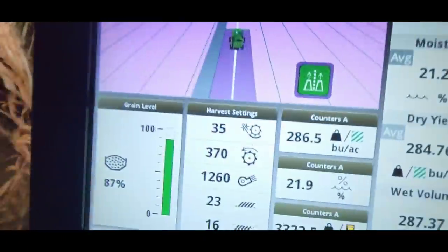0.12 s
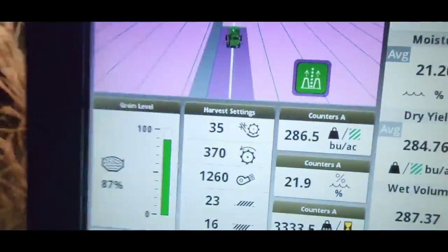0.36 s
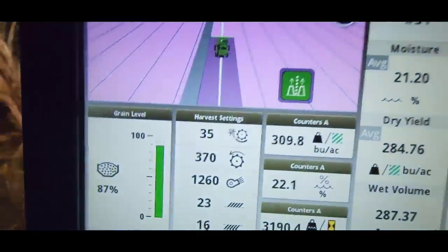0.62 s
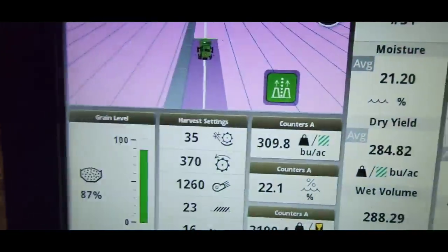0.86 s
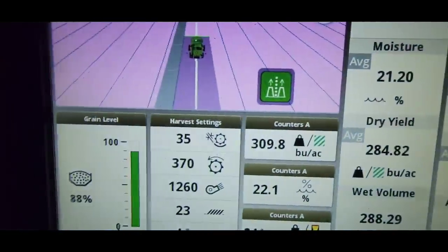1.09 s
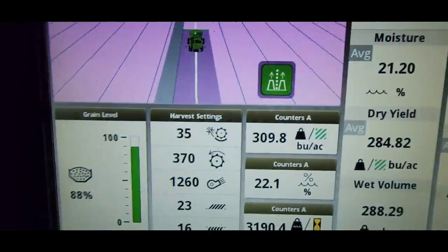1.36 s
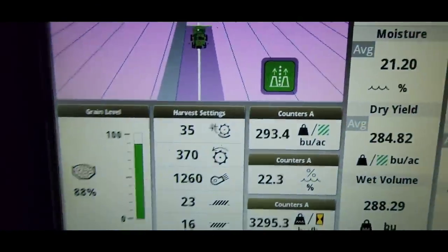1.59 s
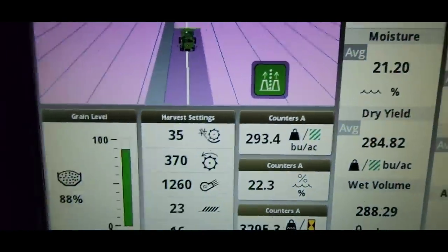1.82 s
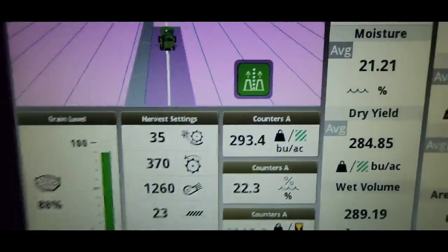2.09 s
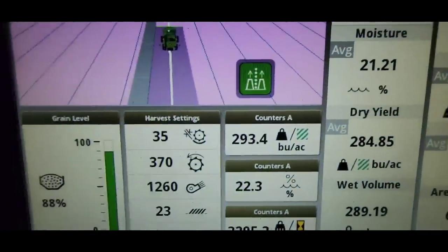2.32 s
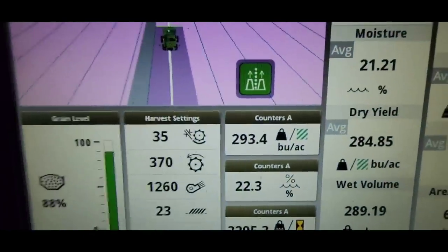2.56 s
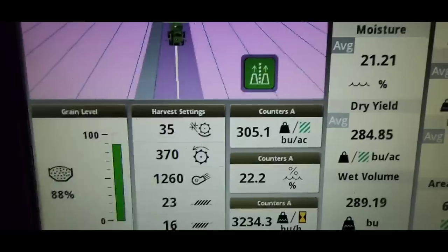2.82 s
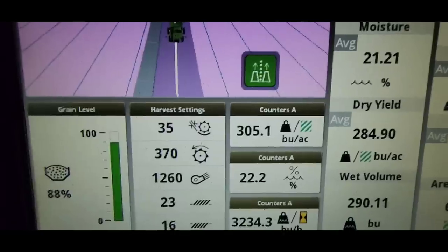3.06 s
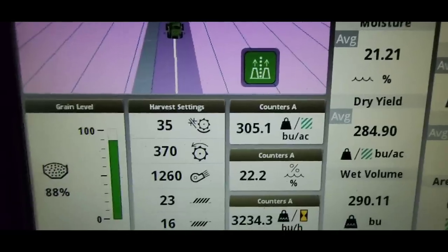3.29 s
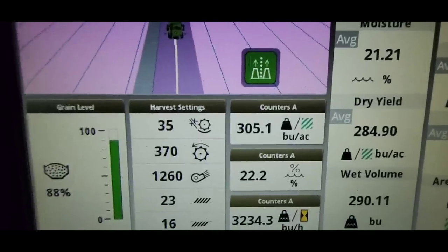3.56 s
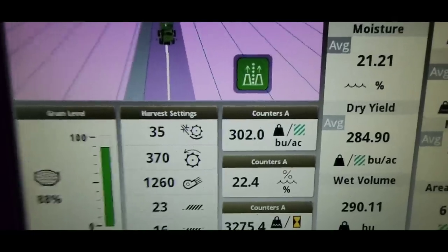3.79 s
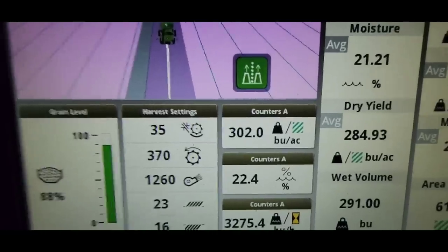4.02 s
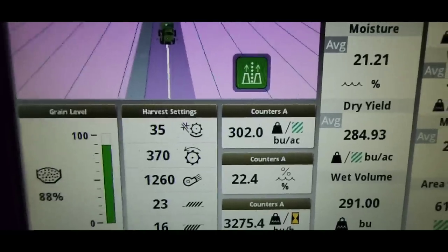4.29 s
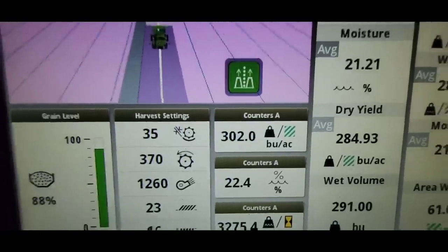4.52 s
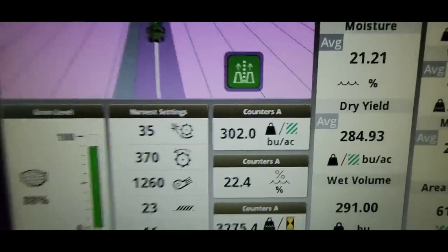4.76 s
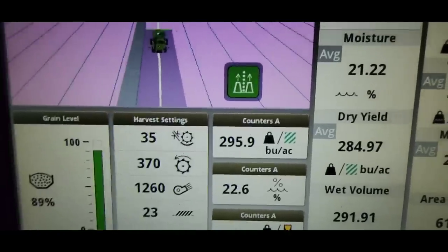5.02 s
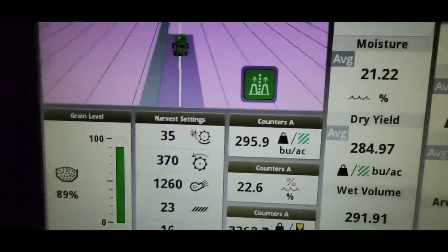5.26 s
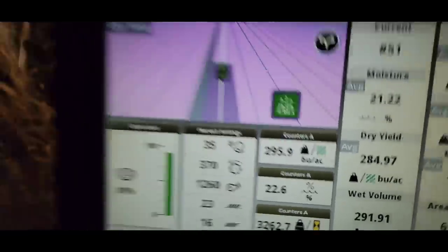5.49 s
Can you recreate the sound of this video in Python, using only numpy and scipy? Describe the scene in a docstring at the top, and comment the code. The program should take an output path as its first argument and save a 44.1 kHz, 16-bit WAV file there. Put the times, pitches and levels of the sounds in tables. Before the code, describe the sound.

A steady, heavy harvester drone heard from the cab: deep pulsing hum, muffled rumble, thin high whine and quiet rushing of fan and grain.

```python
"""The six-cylinder firing hum of a combine harvester wavers near 96 Hz inside its closed cab as it shells corn.
Crank, rotor and shaft tones and a pump whine sing faintly through the panels as wavering sines.
The machine's rumble, noise shaped by peaks and dips, booms low and throbs about once a second.
Fan air and kernels rush above it as finer noise; a hand-held phone hears it all in stereo."""
import sys
import numpy as np
from scipy import signal
from scipy.fft import rfft, irfft, next_fast_len
from scipy.io import wavfile
from scipy.ndimage import uniform_filter1d

SR = 44100
rng = np.random.default_rng(int(sys.argv[2]) if len(sys.argv) > 2 else 0)


def undo_db(level):
    """Turn decibels back into plain size, where 20 dB means ten times bigger."""
    steps = np.asarray(level, float) / 20
    return 10 ** steps


def put_to_file(sound):
    """Save the sound as 16-bit audio at rate SR, in the file named by the first command-line argument."""
    columns = np.atleast_2d(sound).T  # one column per channel
    safe = np.clip(columns, -1, 1)
    whole_steps = np.round(safe * 32767)
    wavfile.write(sys.argv[1], SR, whole_steps.astype(np.int16))


N = 248283

# Swells of the firing hum as it beats against nearby shaft tones; each lasts until the next.
# Each row: start in seconds, pitch in Hz, rms level in dB before dips and glides, sign (+1 or -1).
HUM_SWELLS = [(-.1, 93.8, -16.5, 1), (.19, 93.6, -31, 1), (.295, 96.5, -20.5, -1), (.575, 95.4, -20.5, 1),
              (.85, 96.6, -16, 1), (.941, 95.6, -17, -1), (1.309, 98, -24, -1), (1.56, 95.1, -20, 1),
              (1.81, 95, -18.5, 1), (2.081, 96.5, -22, 1), (2.26, 95.3, -21.5, -1), (2.42, 95.8, -19, 1),
              (2.601, 95.5, -19.5, -1), (2.76, 94.2, -18.5, -1), (3.04, 96.2, -16, 1),
              (3.459, 97.4, -23, -1), (3.72, 96.8, -20.5, 1), (3.82, 96.2, -20.5, 1), (4.05, 96.3, -17, -1),
              (4.38, 95, -17.5, -1), (4.65, 97.6, -19.5, 1), (5.05, 96.7, -18, -1), (5.3, 93.3, -20.5, 1),
              (5.51, 98.7, -25.5, -1)]
# Crankshaft orders in the panels. Each row: multiple of crank speed, rms level in dB, waver in dB,
# left minus right in dB, left lead in radians.
CRANK_ORDERS = [(11, -44.5, 3, 0, -.6), (16, -47, 4, 0, .1)]
# Threshing rotor orders in the frame. Each row: multiple of rotor speed, rms level in dB, waver in dB,
# left minus right in dB, left lead in radians.
ROTOR_ORDERS = [(4, -48, 2, 0, 0), (9, -46, 2, 0, 0), (12, -42, 2, 0, 0), (19, -40, 2, -.7, 0),
                (20, -37, 2, -.7, 0)]
# Other shafts, gears and the pump. Each row: pitch in Hz, rms level in dB, waver in dB,
# left minus right in dB, left lead in radians.
SHAFT_TONES = [(20.1, -49, 2, 0, 0), (32.4, -41, 2, 0, 0), (45.4, -43, 3, 0, 0), (58.3, -43, 2, 0, 0),
               (82.4, -38, 2, 0, 0), (255, -44, 3, 0, 1.3), (415.4, -51, 3, 2, 0), (443, -54, 3, 1, 0),
               (648, -59, 3, 0, 0), (792.6, -61, 3, 0, 0), (831, -62, 3, 0, 0), (854.3, -48.5, 2, -4, 2.2),
               (1709, -57.5, 2, -3, .1)]
# Pump and gear whine. Each row: centre in Hz, width of flutter in Hz, rms level in dB, left minus right in dB.
WHINE_TONES = [(1863, 38, -47, -7.5), (2590, 29.85, -63.5, 0), (2720, 19.95, -59, -16),
               (2760, 17.8, -62, 3)]
# Rumble of rotor, chains and frame before its peaks and dips. Each row: frequency in Hz, relative dB per Hz.
RUMBLE_SPECTRUM = [(14, -36), (22, -20), (27, -9.5), (38, -11), (47, -5), (56, -9.5), (65, -8.5), (100, -4),
                   (185, -12), (300, -18.5), (375, -28), (480, -20.5), (700, -29), (1000, -30.5),
                   (1100, -49), (1500, -63)]
# Peaks and dips of the rumble; the dip at 96 Hz leaves room for the hum.
# Each row: centre in Hz, width in Hz, boost or cut in dB.
RUMBLE_PEAKS = [(75, 8, -1), (85.8, 10, 8), (96.2, 6.1, -9.5), (127, 27.3, 7), (159, 13, 1),
                (183.3, 9.4, -5), (203.3, 36, 5.5), (222, 9.1, -2.5), (256, 31.4, 10.5), (274, 17, -3),
                (340.2, 30, 10), (412, 22, 8), (441, 39, 4), (433, 8.1, -2.5), (487, 17, -1.5),
                (520, 24, 4), (560, 23, -1.5), (610, 41, 2.5), (654, 28, 5), (680, 30, -1.5), (723, 50, 4),
                (770, 16, 3.5), (803, 14, -1), (832, 11, 2), (868, 10, -2.5), (880, 17, 1)]
# Low bands that throb. Each row: centre in Hz, width in Hz, depth in dB.
THROB_BANDS = [(127, 25, 0.71), (249, 25, 2.34)]
# Rush of fan air and kernels, falling with pitch above 2 kHz and ending near 15.4 kHz.
# Each row: frequency in Hz, relative dB per Hz.
RUSH_SPECTRUM = [(620, -43), (1050, -13), (1100, -9.5), (1500, -7), (1840, -3), (2080, 1), (2570, -7.5),
                 (3000, -9.5), (3600, -12.5), (4200, -13.5), (4600, -17), (5890, -21.5), (6900, -25),
                 (7540, -25), (9300, -33.5), (9860, -37), (11000, -33.5), (11500, -27.5), (12000, -31),
                 (14300, -36.5), (15000, -40), (15350, -44), (15450, -70)]
# Width of the diffuse field at the two ports. Each row: frequency in Hz, side minus mid in dB.
FIELD_WIDTH = [(30, -34), (125, -17.5), (165, -12), (300, -10.5), (375, -5.5), (450, -9), (545, -13),
               (600, 1), (660, -6), (850, 5), (970, -5.5), (1090, 6), (1250, 6.5), (1500, 1.5),
               (1900, -0.5), (15000, -0.5)]
# Lean of the diffuse field. Each row: frequency in Hz, left minus right in dB.
FIELD_LEAN = [(60, 0), (125, -.7), (175, -3.5), (210, .5), (290, -.6), (400, 3), (520, .5), (620, 1),
              (700, -1.8), (780, .6), (900, -1.8), (1400, -1), (1600, -4.6), (3900, -4.5), (4500, -5.8),
              (6000, -.8), (8200, -2.3), (9900, -.2), (11500, -3.3), (13400, 1), (14500, 3.7)]

CRANK_HZ, ROTOR_HZ = 31.56, 6.128  # turns per second
DIP_DB, DIP_HALF_S = -5.5, 0.053  # depth and half length of a dip between swells
GLIDE_S = 0.051  # pitch and level glide between swells, smoothed twice over this span
THROB_S, THROB_PEAK_S = 1.023, 2.447  # period and a moment of the peak
RUMBLE_DB, RUSH_DB = -21, -38  # rms of the mid channel

EARS = np.array([[1.], [-1.]])  # left, right
T = np.arange(N) / SR
SIZE = next_fast_len(N)
HZ = np.arange(SIZE // 2 + 1) * SR / SIZE + 1e-3  # nudged off zero for the log


def along(table):
    """Joins a table of Hz and dB on a log-frequency axis."""
    hz, db = np.transpose(table)
    return np.interp(np.log(HZ), np.log(hz), db)


def walk(rate):
    """Random levels held for 1 / rate seconds and slewed twice, scaled to a standard deviation of 1."""
    hold = max(int(SR / rate), 1)
    held = np.repeat(rng.standard_normal(N // hold + 1), hold)[:N]
    slewed = uniform_filter1d(uniform_filter1d(held, hold), hold)
    return slewed / slewed.std()


def bell(hz, width):
    """A resonance-shaped bell: 1 at its centre, one half at the edges of its width."""
    return 1 / (1 + (2 * (HZ - hz) / width) ** 2)


def field(db, swell_db, swell_rate, flicker_db, flicker_rate):
    """Stereo noise in overlapping octave bands that swell together and flicker alone; low bands throb."""
    mid, side = rfft(rng.standard_normal((2, SIZE)))
    spread = mid + EARS * undo_db(along(FIELD_WIDTH)) * side
    ears = undo_db(db + EARS * along(FIELD_LEAN) / 2) * spread
    swell = swell_db * walk(swell_rate)
    out = 0
    for octave in range(3, 15):  # centres at 8 Hz to 16 kHz
        share = np.cos(np.pi / 2 * np.clip(np.log2(HZ) - octave, -1, 1)) ** 2
        band = irfft(share * ears, SIZE)[:, :N]
        out = out + undo_db(swell + flicker_db * walk(flicker_rate)) * band
    throb = np.cos(2 * np.pi * (T - THROB_PEAK_S) / THROB_S)
    for hz, width, depth_db in THROB_BANDS:
        band = irfft(ears * bell(hz, width), SIZE)[:, :N]
        out = out + (undo_db(depth_db * throb) - 1) * band
    mid_rms = np.sqrt(np.mean(out.sum(axis=0) ** 2)) / 2
    return out / mid_rms


def tones(table, hz, drift, blur):
    """Sines on multiples of a speed that wanders slightly at random; each one's phase wanders too."""
    turn = 2 * np.pi * np.cumsum(hz * (1 + drift * walk(3.49))) / SR
    out = 0
    for multiple, db, waver_db, pan_db, lead in table:
        phase = multiple * turn + 2 * np.pi * rng.random()
        phase = phase + blur * walk(8.) + EARS * lead / 2
        level_db = db + waver_db * walk(6.5) + EARS * pan_db / 2
        out = out + np.sqrt(2) * undo_db(level_db) * np.sin(phase)
    return out


def hum():
    """Firing tone, nearly alike at both ports; it dips between swells and nulls where its sign reverses."""
    start, hz, db, sign = np.transpose(HUM_SWELLS)
    swell = np.maximum(np.searchsorted(start, T) - 1, 0)
    glide = int(GLIDE_S * SR)
    steps = np.array([hz[swell], (undo_db(db) * sign)[swell]])
    pitch, level = uniform_filter1d(uniform_filter1d(steps, glide, axis=1), glide, axis=1)
    dip = np.clip(1 - np.abs(T - start[:, None]) / DIP_HALF_S, 0, 1).sum(axis=0)
    phase = 2 * np.pi * np.cumsum(pitch) / SR
    return np.sqrt(2) * level * undo_db(DIP_DB * dip - 0.22 * EARS) * np.sin(phase + 0.023 * EARS)


def crank():
    """Crankshaft orders singing through the panels."""
    return tones(CRANK_ORDERS, CRANK_HZ, drift=0.0015, blur=0.46)


def rotor():
    """Threshing rotor orders carried by the frame."""
    return tones(ROTOR_ORDERS, ROTOR_HZ, drift=0.0015, blur=0.26)


def shafts():
    """Other shafts, gears and the pump; at a base of 1 Hz the multiples are pitches in Hz."""
    return tones(SHAFT_TONES, 1, drift=0.00142, blur=0.28)


def whines():
    """Pump and gear tones blurred by speed flutter; their pitch wanders separately at each port."""
    out = 0
    for hz, width, db, pan_db in WHINE_TONES:
        pitch = hz + width / 2 * np.array([walk(25), walk(25)])
        phase = 2 * np.pi * np.cumsum(pitch, axis=1) / SR
        out = out + np.sqrt(2) * undo_db(db + EARS * pan_db / 2) * np.sin(phase)
    return out


def rumble():
    """Machine noise shaped by peaks and dips; the dip at 96 Hz leaves room for the hum."""
    peaks_db = sum(db * bell(hz, width) for hz, width, db in RUMBLE_PEAKS)
    noise = field(along(RUMBLE_SPECTRUM) + peaks_db,
                  swell_db=-0.15, swell_rate=1.8, flicker_db=0.48, flicker_rate=6.3)
    return undo_db(RUMBLE_DB) * noise


def rush():
    """A smooth hiss of fan air and kernels with a fast, slight random flicker."""
    noise = field(along(RUSH_SPECTRUM), swell_db=0.43, swell_rate=25., flicker_db=0.39, flicker_rate=25.)
    return undo_db(RUSH_DB) * noise


def scene():
    """All sources, left and right."""
    return hum() + crank() + rotor() + shafts() + whines() + rumble() + rush()


def band_limit(x):
    """A steep low-pass at the top of the band."""
    return signal.sosfilt(signal.butter(12, 15490, fs=SR, output="sos"), x)


def record(dry):
    """The phone barely rounds the loudest peaks."""
    drive = 0.5
    mix = np.tanh(drive * dry) / drive
    return band_limit(mix)


dry = scene()
out = record(dry)
put_to_file(out)
```